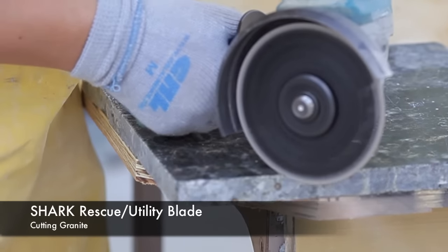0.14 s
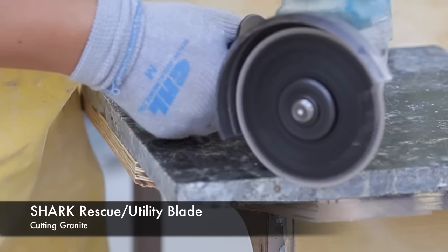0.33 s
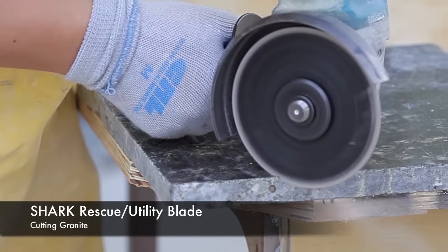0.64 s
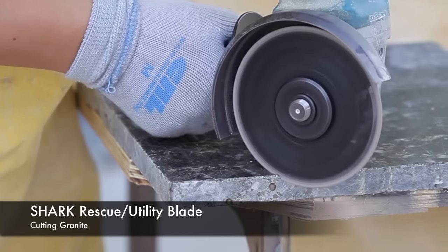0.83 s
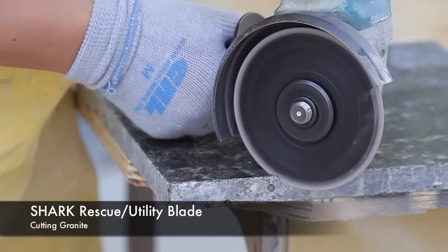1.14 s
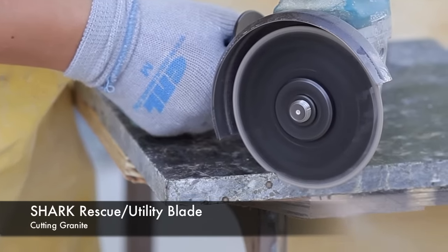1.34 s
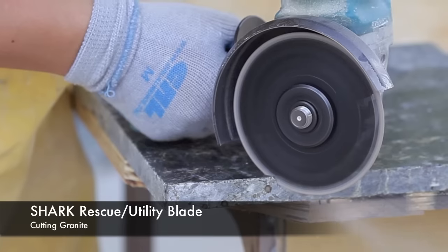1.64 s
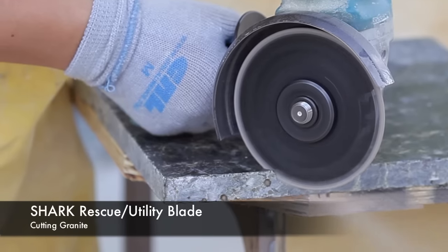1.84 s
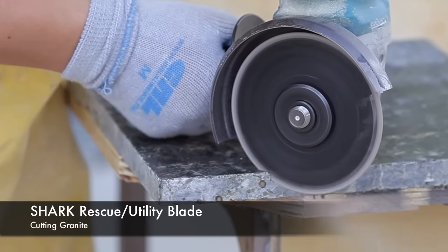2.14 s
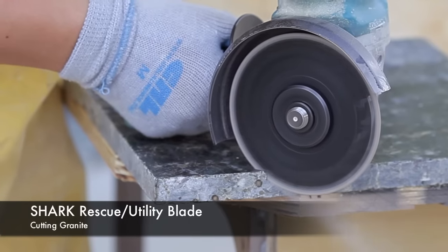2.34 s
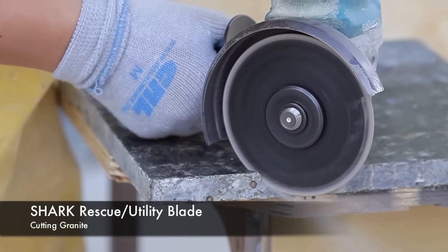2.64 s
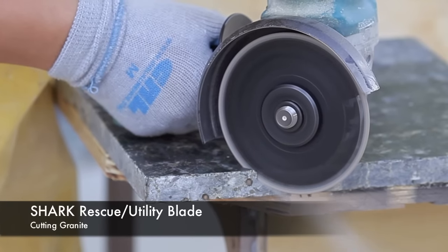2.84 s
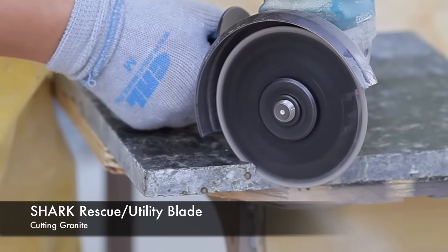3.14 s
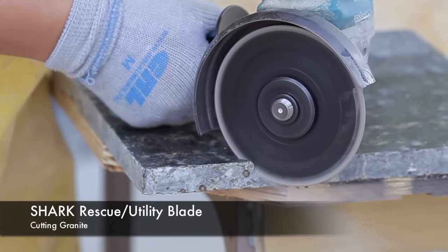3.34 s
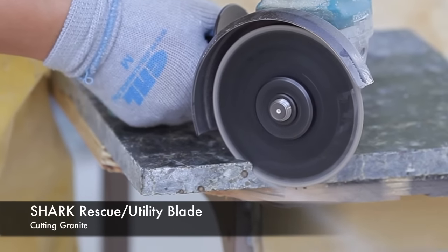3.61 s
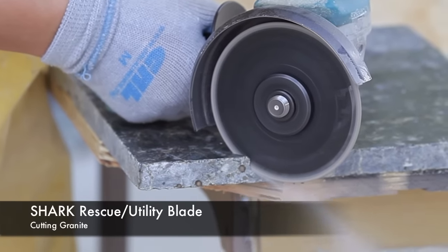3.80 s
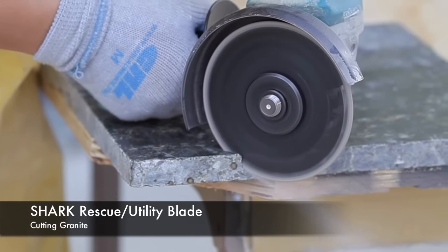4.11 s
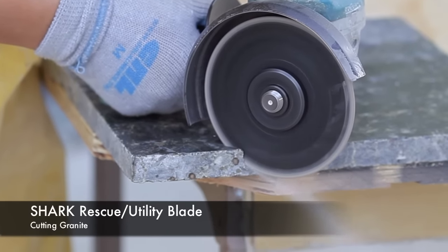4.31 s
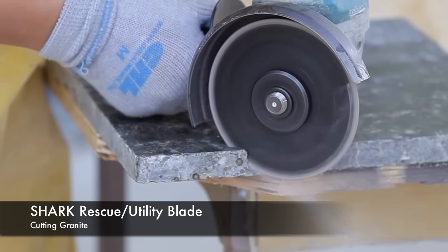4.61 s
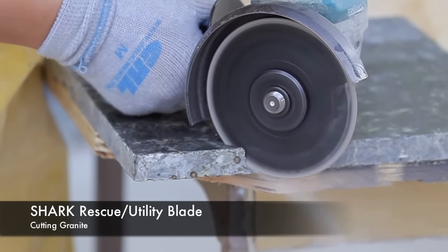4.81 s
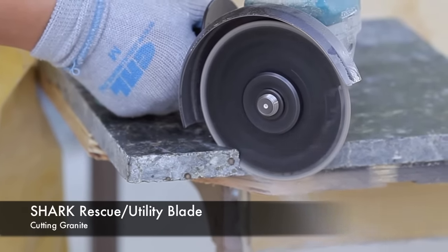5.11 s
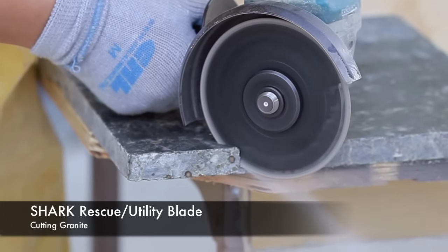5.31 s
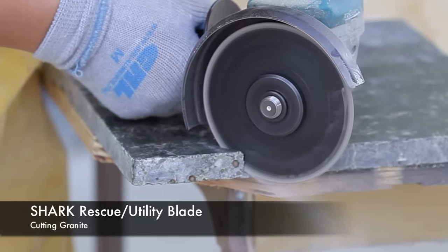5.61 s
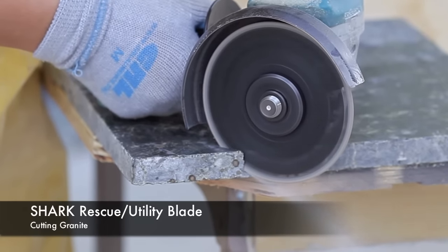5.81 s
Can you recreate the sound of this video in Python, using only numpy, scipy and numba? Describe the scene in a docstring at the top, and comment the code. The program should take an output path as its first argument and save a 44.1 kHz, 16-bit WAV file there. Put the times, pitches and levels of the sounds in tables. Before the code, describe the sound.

A hand-held angle grinder cuts a granite slab at a workbench, very close and dry, already at full speed and never stopping over about six seconds. The main sound is a loud, harsh, bright grinding hiss, strongest in the upper mids, in which the steel disc rings with many dense, inharmonic tones. It buzzes finely about ninety times a second and trembles with the hands, with a short surge near 0.9 s and small changes around 2 to 3 s. Beneath are motor rush, gear whines that come and go, and a very faint low hum and rumble. From about 2.5 s the cut sounds deeper and rawer, and its top slowly brightens. A soft dull knock comes at 2.9 s, with more crumbling knocks from 4 to 5.5 s. Sharp chirping squeals begin near 3.5 s, recur sparsely, and crowd together strongly between 5.3 and 5.7 s as grinding continues.

```python
"""At a workbench, close to the microphone, an angle grinder's diamond blade cuts a granite slab.
The grit on the rim scrapes the stone, harder once a turn, and this noise rings the steel disc's modes.
The rim squeals in short chirping bursts, and chips knock in the cut as sums of fading noise bursts.
Shaft orders and gears whine as sines locked to the turning, some only for a while.
Behind them lie a coloured motor rush, a bench rumble and a low hum that drifts upward."""
import sys
import numpy as np
from scipy import signal
from scipy.fft import rfft, irfft, next_fast_len
from scipy.io import wavfile
from scipy.ndimage import uniform_filter1d, minimum_filter1d
from numba import njit

SR = 44100
rng = np.random.default_rng(int(sys.argv[2]) if len(sys.argv) > 2 else 0)


def to_wav(s):
    """Save 16-bit WAV."""
    ch = np.atleast_2d(s).T  # columns
    pcm = np.round(np.clip(ch, -1, 1) * 32767)  # PCM
    wavfile.write(sys.argv[1], SR, pcm.astype(np.int16))


N = 262395
TIME = np.arange(N) / SR


def undb(db):
    """Decibel law: amplitude ratio of a level in dB."""
    return 10 ** (np.asarray(db) / 20)


def level(x, db):
    """Root-mean-square scaling: bring x to an RMS level in dB."""
    return x * undb(db) / np.sqrt(np.mean(x ** 2))


def curves(table):
    """Linear interpolation: the columns of a table joined by straight lines in time."""
    s, *columns = np.transpose(table)
    return [np.interp(TIME, s, column) for column in columns]


def colour(x, points):
    """Spectral shaping by (Hz, dB) points, straight on a log-frequency axis."""
    size = next_fast_len(N)
    hz, db = np.transpose(points)
    bin_hz = np.arange(1, size // 2 + 2) * SR / size
    gain = undb(np.interp(np.log(bin_hz), np.log(hz), db))
    return irfft(rfft(x, size) * gain, size)[:N]


def ring(x, hz, width):
    """Resonance: a second-order peak of the given width in Hz, gain 1 at its centre."""
    return signal.lfilter(*signal.iirpeak(hz, hz / width, fs=SR), x)


def walk(rate):
    """Random modulation: `rate` random values a second, eased into each other; spread near 1."""
    place = TIME * rate
    k = place.astype(int)
    ease = 0.5 - 0.5 * np.cos(np.pi * (place - k))
    value = rng.standard_normal(k[-1] + 2)
    return 1.18 * (value[k] * (1 - ease) + value[k + 1] * ease)


def order_sine(multiple, turn, db, phase):
    """Shaft order: a sine at a multiple of the blade speed, db being its RMS level."""
    return undb(db) * np.sqrt(2) * np.sin(2 * np.pi * multiple * turn + phase)


# Blade speed. Each row: time in seconds, speed in turns per second.
BLADE_SPEED = [(0, 92.45), (2.2, 92.43), (5.95, 91.82)]


def rotation():
    """Kinematics: the speed, slightly unsteady, sums up to the number of turns made."""
    speed = curves(BLADE_SPEED)[0] * (1 + 0.000752 * walk(6))
    return speed, np.cumsum(speed) / SR


# Uneven push of the hands, with quick surges and lapses.
# Each row: time in seconds, cutting level in dB before bounce and jolts.
HAND_PUSH = [(0.02, -19.5), (0.05, -19), (0.84, -17.5), (0.87, -13.5), (0.9, -17.5), (1.98, -17.5),
             (2.12, -16), (2.15, -19.5), (2.25, -18), (2.49, -19.5), (2.54, -16), (2.77, -18),
             (3.23, -17.5), (3.26, -20), (3.65, -18), (5.24, -17.5), (5.28, -17.5), (5.9, -16.5)]
JUDDER_HZ, JUDDER_WIDTH_HZ, JUDDER_DB = 15.8, 4.3, 0.63  # the hand-held blade bounces in the slot
# peak of the extra bite in dB and its rise time in s, for a knock of strength JOLT_KNOCK_DB
JOLT_DB, JOLT_S, JOLT_KNOCK_DB = 3, 0.034, -38.5


def pressure():
    """Contact force as a level in dB: uneven push of the hands, narrow-band bounce, a jolt as each chip breaks."""
    bounce = ring(rng.standard_normal(N), JUDDER_HZ, JUDDER_WIDTH_HZ)
    jolt = 0
    for s, db in CHIP_KNOCKS:
        u = np.maximum(TIME - s, 0) / JOLT_S
        jolt = jolt + undb(db - JOLT_KNOCK_DB) * u * np.exp(1 - u)
    return curves(HAND_PUSH)[0] + JUDDER_DB * level(bounce, 0) + JOLT_DB * jolt


def bite(turn, depth, sharp, scatter_db):
    """Periodic modulation: a high spot presses once a turn, by a random amount, and lets go slowly."""
    size = undb(scatter_db * rng.standard_normal(size=700))[turn.astype(int)]
    part = turn % 1
    rise = np.minimum(part / 0.23, 1)
    return 1 + depth * size * np.exp(-part / sharp) * rise


@njit
def repeat(x, lag, keep):
    """Recursive delay (comb filter): each turn keeps a share of the turn before it."""
    y = x * np.sqrt(1 - keep * keep)
    for i in range(len(x)):
        if i >= lag[i]:
            y[i] += keep * y[i - lag[i]]
    return y


def grit(speed, turn, keep, depth):
    """Frictional noise: diamond grains meet the stone, and the same grains come round again."""
    lag = np.round(SR / speed).astype(np.int64)  # samples in one turn
    grains = repeat(rng.standard_normal(N), lag, keep)
    pressed = grains * bite(turn, depth, sharp=0.28, scatter_db=5.0)
    return level(pressed * undb(0.55 * walk(14)), 0)


# Frequencies of the disc's modes, in Hz.
MODE_HZ = [2575, 2773, 3050, 3420, 3775, 3840, 4060, 4715, 4820, 5068, 5240, 5435, 5702, 6098, 6230, 6862,
           6982, 7580, 7697, 8290, 8420, 9290, 9508, 10240, 11218, 12345, 13057, 13938, 14350, 15408]
# Ringing of those modes in the same order; the slot grips the disc and shifts it.
# Each row: nominal width in Hz, relative level in dB, change of level at full depth in dB.
MODE_RINGING = [(40.5, -11, -1), (14, -7, -6), (109, -22.5, 8.5), (173, -11.5, 2), (42.3, -2, 3),
                (124, -5, 0.5), (86, -3.5, -14), (30, -1, 1.5), (152, -7, 4.5), (51, 3, -6.5),
                (80, -7.5, 6), (70, -5.5, -4.5), (68.5, 1, 0.5), (55.4, 2, -4), (137, -0.5, -2),
                (95.5, 4, -4), (40, 2, 1.5), (60.3, -2, 2.2), (44.4, -0.5, 1), (75, -12.5, 10),
                (134, -16, 11.5), (140, -14, -2.5), (50, -9, -3), (55, -7, -3), (80, -22.5, 7),
                (55, -19, -9), (45, -13, -11), (40, -17, -8), (70, -26, -4), (35, -26, -6)]
# Colour of the bare scrape. Each row: frequency in Hz, relative spectral level in dB.
SCRAPE_COLOUR = [(1200, -44), (2000, -30.5), (2500, -7.5), (3230, -11.5), (3600, 1.5), (4300, -5),
                 (5300, -3.5), (7150, -1), (7950, -4), (8900, -13.5), (10900, -18.5), (12100, -17.5),
                 (13500, -25), (16500, -24.5)]
TOP_RING_HZ = 8600  # modes from here up form the top ring
# the top ring grows with the contact: starting level, its rise, time constant of the rise
TOP_DB, TOP_RISE_DB, TOP_RISE_S = -36.5, 5, 3.1
TOP_SWING = 1.46  # dB of top ring for each dB of pressure


def blade(speed, turn, depth, cut_db):
    """Modal excitation: grit noise drives the disc's modes, each flickering as the contact shifts."""
    push = grit(speed, turn, keep=0.32, depth=1.6 + 1.2 * depth)
    low, high = 0, 0
    for k, (hz, (width, db, change_db)) in enumerate(zip(MODE_HZ, MODE_RINGING)):
        # the mode blends a narrow and a wide ring; the deeper the cut, the wider
        narrow = ring(push, hz, 0.8 * width)
        wide = ring(push, hz, 1.1 * width)
        ringing = (1 - depth) * narrow + depth * wide
        sign = (-1) ** k  # neighbouring modes in opposite phase
        mode = sign * undb(db + change_db * depth + 0.69 * walk(16)) * ringing
        if hz < TOP_RING_HZ:
            low = low + mode
        else:
            high = high + mode
    # the middle modes radiate little far above and below their own range
    low = signal.sosfilt(signal.butter(3, [1900, 9500], "band", fs=SR, output="sos"), low)
    # the deeper the cut, the more bare scraping beside the ringing
    bare = colour(grit(speed, turn, keep=0.067, depth=1.4 + 0.35 * depth), SCRAPE_COLOUR)
    scrape = level(bare, -8.5) * undb(4.24 * depth)
    rise_db = TOP_RISE_DB * (1 - np.exp(-TIME / TOP_RISE_S))
    top_db = TOP_DB + rise_db + TOP_SWING * (cut_db - np.mean(cut_db))
    return undb(cut_db) * (level(low, 0) + scrape) + undb(top_db) * level(high, 0)


# Rim squeals. Each row: start in seconds, strength in dB before the ringing, length in turns.
RIM_SQUEALS = [(3.454, -19, 2.5), (3.5304, -17, 2), (3.5952, -15, 1.8), (3.7794, -11, 2.2),
               (3.8342, -14, 1.4), (4.2901, -14, 2.1), (4.6269, -13, 1.7), (4.9303, -15, 1.9),
               (5.094, -13, 1.5), (5.1592, -14, 1.6), (5.2679, -18, 2.5), (5.2904, -9, 2),
               (5.3664, -7, 1.8), (5.454, -12, 1.6), (5.5214, -8, 1.7), (5.5837, -8.5, 4.6),
               (5.682, -7.5, 3.2), (5.8341, -36, 1.8), (5.8666, -34, 2.8)]


def squeal():
    """Stick-slip friction: the rim skids once a turn, each skid chirping upward and ringing two top modes."""
    out = np.zeros(N)
    for s, db, turns in RIM_SQUEALS:
        i = int(s * SR)
        u = TIME[:min(4000, N - i)] * BLADE_SPEED[-1][1]  # turns since the start
        skid = u % 1
        hz = 8900 + 1600 * np.minimum(skid / 0.35, 1)
        burst = undb(db) * np.exp(-(u / turns) ** 4)
        pulse = np.exp(-skid / 0.22) * np.minimum(skid / 0.044, 1)
        out[i:i + len(u)] += burst * pulse * np.sin(2 * np.pi * np.cumsum(hz) / SR)
    # noise roughens the tone
    out = out * (1 + 1.1 * ring(rng.standard_normal(N), 400, 3000))
    return undb(-6.5) * out + undb(11.5) * ring(out, 10240, 60.3) + undb(2) * ring(out, 9290, 95)


# The strongest low whine of the gears. Each row: time in seconds, level in dB.
GEAR_WHINE = [(0, -42), (.5, -53), (1, -39), (2, -42.5), (3, -41), (3.7, -47.5), (4.2, -42), (5.2, -37),
              (5.95, -63)]
GEAR_ORDER = 27.92  # multiple of the blade speed


def gear(turn):
    """Gear whine: one multiple of the blade speed, slightly unsteady in level and phase."""
    db = curves(GEAR_WHINE)[0]
    return order_sine(GEAR_ORDER, turn, db + 1.2 * walk(20), 0.7 * walk(30))


# Whines that sing for a while only.
# Each row: multiple of the blade speed, start in seconds, end in seconds, level in dB.
PASSING_ORDERS = [(30, .3, 2.5, -41), (32, .3, 1.6, -47), (33, 2.3, 3.9, -43), (31, 2.5, 3.8, -45.5)]
PASSING_FADE_S = 0.08


def passing(turn):
    """Gated shaft orders: whines that come up and drop out again as the cut goes on."""
    out = 0
    for multiple, start, end, db in PASSING_ORDERS:
        gate = np.clip(np.minimum(TIME - start, end - TIME) / PASSING_FADE_S, 0, 1)
        out = out + gate * order_sine(multiple, turn, db + 1.8 * walk(15), 0.73 * walk(25))
    return out


# Steady whines. Each row: multiple of the blade speed, level in dB.
SHAFT_ORDERS = [(3, -74), (4, -73), (7, -65), (8, -51.5), (9, -71), (11, -64.5), (13, -60), (14, -66.5),
                (15, -55), (16, -59), (17, -77), (18, -78), (19, -54.5), (20, -60), (21, -65.5), (24, -64),
                (31, -51), (32, -52), (34, -61), (41, -67), (53, -52), (55, -38.5), (57, -61)]


def shaft_orders(turn):
    """Harmonics of rotation: sines at multiples of the blade speed, wavering in level and phase."""
    whine = 0
    for multiple, db in SHAFT_ORDERS:
        # higher orders wander more in phase, so their lines are wider
        phase = 0.032 * multiple * walk(25) + rng.uniform(0, 2 * np.pi)
        whine = whine + order_sine(multiple, turn, db + 1.2 * walk(18), phase)
    return whine


# Chips knocking in the cut. Each row: start in seconds, strength in dB before the resonances.
CHIP_KNOCKS = [(2.877, -51), (4.027, -47), (4.164, -51), (4.221, -47.5), (4.287, -43.5), (4.407, -48),
               (4.566, -47), (4.929, -51), (5.277, -42), (5.374, -45), (5.437, -43), (5.514, -56)]


def knocks():
    """Impact noise: dull, crumbling bursts through broad resonances that reach into the slab's bass."""
    gate = np.zeros(N)
    for s, db in CHIP_KNOCKS:
        u = np.maximum(TIME - s, 0)
        decay = np.exp(-u / 0.0051) + 0.16 * np.exp(-u / 0.069)
        gate += undb(db) * (1 - np.exp(-u / 0.0028)) * decay
    crumble = gate * rng.standard_normal(N)
    bass = ring(ring(crumble, 340, 860), 340, 860)
    return undb(13.5) * bass + undb(22) * ring(crumble, 1040, 1500)


# Colour of motor, gears and cooling air. Each row: frequency in Hz, relative spectral level in dB.
MOTOR_COLOUR = [(40, -40), (90, -20.5), (200, -17.5), (450, -19.5), (600, -15.5), (680, -10.5), (880, -7.5),
                (950, -14.5), (1150, -10.5), (1310, -6.5), (1400, -5), (1950, -6), (2300, -5), (3000, -46)]
MOTOR_DB = -48  # before the load is added


def motor(turn, depth, cut_db):
    """Broadband flow noise: rush of air and gears, pulsing with the shaft and rising with the load."""
    pulsing = rng.standard_normal(N) * bite(turn, depth=0.9, sharp=0.3, scatter_db=2.5)
    rush = level(colour(pulsing, MOTOR_COLOUR), MOTOR_DB)
    # the motor labours when the blade presses harder
    press_db = uniform_filter1d(cut_db, size=4000)
    return rush * undb(5.13 * depth + 0.5 * (press_db - np.mean(press_db)))


# Low hum. Each row: time in seconds, frequency in Hz, level in dB.
LOW_HUM = [(0.05, 136.7, -61), (0.36, 137, -73), (0.7, 138, -59), (1.15, 140, -66), (1.4, 140.5, -76),
           (1.65, 141, -67), (2.45, 143, -67.5), (2.6, 143.6, -63), (2.92, 147.4, -65), (3.6, 150, -67),
           (4.5, 149, -68), (5.95, 149, -82)]


def hum():
    """Frequency modulation: a low tone creeps upward, swells and sinks, then fades."""
    hz, db = curves(LOW_HUM)
    return undb(db) * np.sqrt(2) * np.sin(2 * np.pi * np.cumsum(hz) / SR)


def bench_rumble():
    """Structural resonance: noise through two resonances in series, a steady rumble of the bench."""
    return level(ring(ring(rng.standard_normal(N), 55, 45), 55, 45), -74.0)


# Depth of the cut. Each row: time in seconds, depth from 0 to 1.
CUT_DEPTH = [(0, 0.5), (1.5, 0.31), (2.5, 0.76), (4, 0.84), (5.95, 0.94)]


def scene():
    """Superposition: all sources share one rotation, depth and pressure, and their sounds add."""
    speed, turn = rotation()
    depth, cut_db = curves(CUT_DEPTH)[0], pressure()
    cutting = blade(speed, turn, depth, cut_db) + squeal() + knocks()
    whines = gear(turn) + passing(turn) + shaft_orders(turn)
    background = motor(turn, depth, cut_db) + hum() + bench_rumble()
    return (cutting + whines + background)[None]


LIMIT_DB = -7  # gain falls above this level
TOP_HZ = 15690  # upper edge of the band


def record(dry):
    """Limiting and band-limiting: gain eases down around loud peaks; deepest bass and top are cut."""
    gain = np.minimum(1, undb(LIMIT_DB) / (np.abs(dry) + 1e-9)) ** 0.76
    gain = minimum_filter1d(gain, size=160)
    gain = uniform_filter1d(uniform_filter1d(gain, size=80), size=80)
    held = signal.sosfilt(signal.butter(2, 30, "high", fs=SR, output="sos"), gain * dry)
    return signal.sosfilt(signal.ellip(14, 0.2, 90, TOP_HZ, fs=SR, output="sos"), held)


dry = scene()
out = record(dry)
to_wav(out)
```